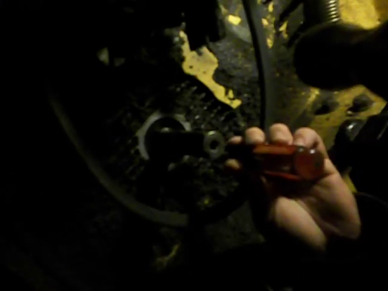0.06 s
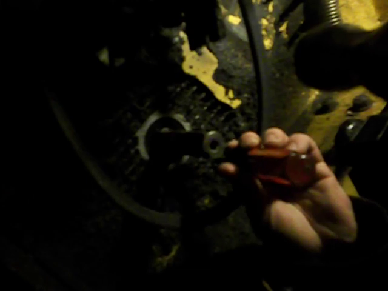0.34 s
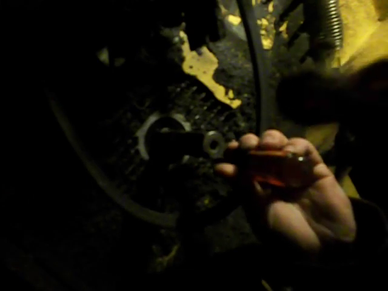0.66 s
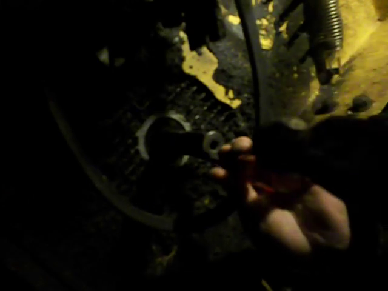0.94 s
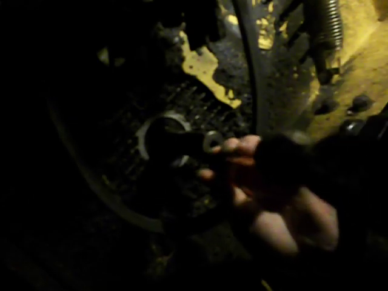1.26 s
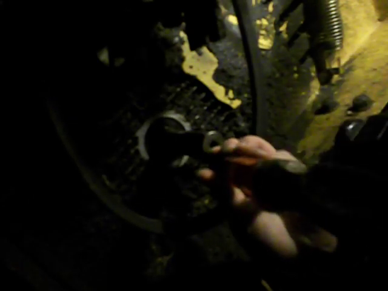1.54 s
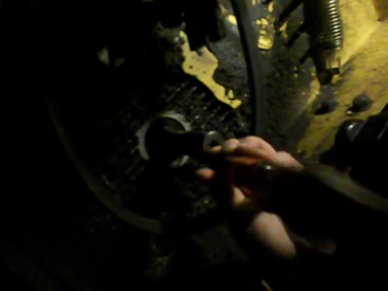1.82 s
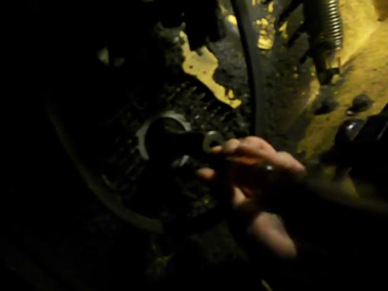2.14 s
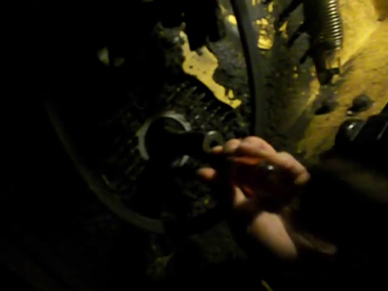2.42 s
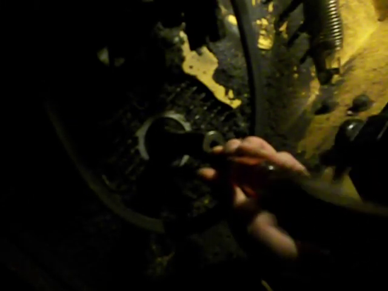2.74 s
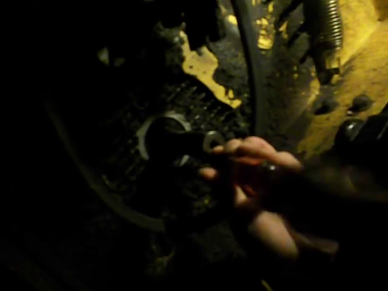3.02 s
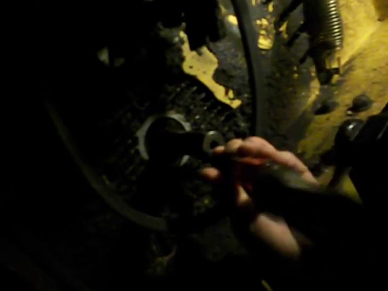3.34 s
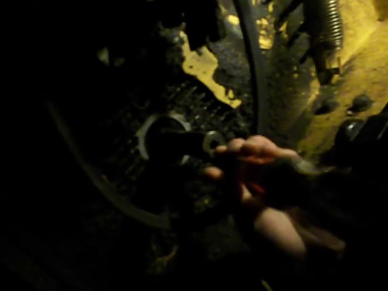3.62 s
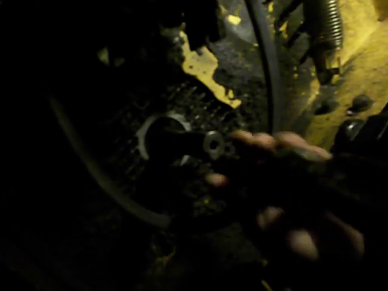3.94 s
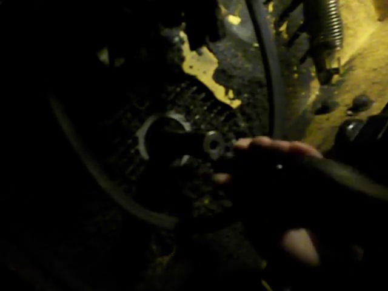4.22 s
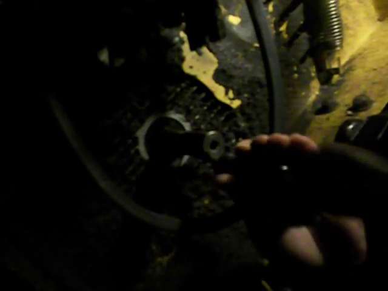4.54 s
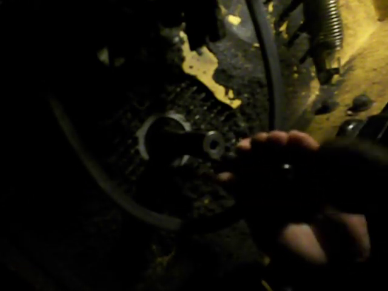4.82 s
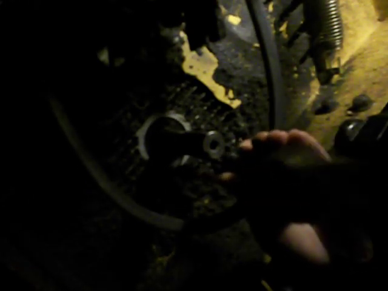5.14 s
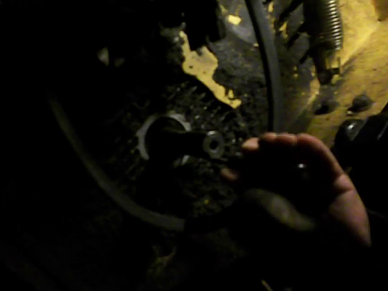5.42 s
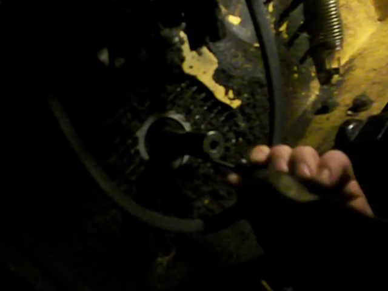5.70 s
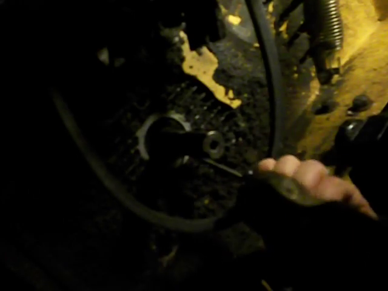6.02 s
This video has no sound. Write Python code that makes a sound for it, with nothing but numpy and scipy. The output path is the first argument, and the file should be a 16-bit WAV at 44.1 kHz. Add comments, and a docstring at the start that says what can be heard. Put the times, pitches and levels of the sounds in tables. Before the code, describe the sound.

A low hum with rumble and light hiss fills a workshop throughout. For the first two seconds there are only faint rubs of a hand on a screwdriver handle, small scrapes of its tip on an engine seal, and one soft knock at about 1.6 seconds. From 2 to 3.7 seconds a hammer taps the screwdriver eight times, between three and four blows a second. Each gives a sharp, short steel clink and a low thud in the engine casing, with a little room echo. Sometimes the hammer bounces lightly or the tip scrapes between blows. After a pause with faint scraping around 4 seconds, four more strong blows fall from 4.5 to 5.3 seconds, ringing slightly longer. The loud hits overload the close microphone and briefly push the background down. A faint rub follows at 5.5 seconds, and the hum carries on to about 6 seconds.

```python
"""A low hum fills a workshop; a hand rubs a screwdriver's handle and its tip scrapes an engine's shaft seal.
Then a hammer taps the screwdriver in two runs of blows. Each blow clinks in the steel and thuds in the
engine casing; sometimes the hammer bounces, or the tip scrapes as it is set back in place.
Loud blows overload the close microphone, and its gain control briefly turns the background down."""
import sys
import numpy as np
from scipy import signal
from scipy.fft import rfft, irfft
from scipy.io import wavfile
from scipy.ndimage import minimum_filter1d

SR = 44100
rng = np.random.default_rng(int(sys.argv[2]) if len(sys.argv) > 2 else 0)


def master(y):
    """Save y as 16-bit WAV."""
    cut = np.clip(np.atleast_2d(y).T, -1, 1)
    pcm = np.round(cut * 32767)  # scale
    wavfile.write(sys.argv[1], SR, pcm.astype(np.int16))


N = 271656
TIME = np.arange(N) / SR
AGE = np.arange(int(.6 * SR)) / SR   # seconds since a contact

# Levels are relative. A "decay" is the time a sound takes to die away by 60 dB.
# tone colour of the workshop's rumble and the microphone's hiss: f/Hz, level/dB
BACKGROUND_COLOUR = [(15, -14), (30, 9), (45, 2.5), (120, -4), (150, 2), (350, -2.5), (550, -5.5),
                     (690, -11.5), (930, -9), (1250, -17.5), (2400, -17.5), (3300, -14), (5200, -11.5),
                     (7100, -18.5), (7700, -30)]
# how the hum and rumble rise and fall: t/s, level/dB
BASS_LEVELS = [(0, -1.5), (1.9, -0.5), (2.5, 2), (3.2, 3), (4.35, -2), (4.7, -1), (5.35, -3), (5.7, -1.5),
               (6.16, -2.5)]
# a faint airy tone swells and fades: t/s, level/dB
AIRY_LEVELS = [(0, -60), (2.6, -48), (3.1, -45), (3.35, -40.5), (3.7, -62), (6.16, -71)]
# a hand rubs the handle (lower) and the tip scrapes the metal (higher): t/s, level/dB, f/Hz
HANDLING_SCRAPES = [(0.068, -26, 4080), (0.15, -33, 1550), (0.451, -36, 1660), (1.588, -32.5, 3330),
                    (1.82, -35, 2400), (2.2, -39, 1700), (2.267, -23, 4630), (2.543, -32, 3980),
                    (2.714, -30, 4840), (2.862, -36, 3700), (3.954, -34, 3570), (4.014, -34, 2360),
                    (5.52, -30, 1800)]
# hammer blows: t/s, clink level/dB, thud level/dB, shank f/Hz, screwdriver ring level/dB, delay until the
# hammer rebounds/s, rebound level/dB
HAMMER_BLOWS = [(1.601, -29, -14, 3390, 7, .010, 0), (1.9834, -1, -3.5, 3910, -2, 0.0029, -0.5),
                (2.300, 2.5, 1, 3730, -2, 0.0037, 2.5), (2.600, 5, -.5, 3650, -2, 0.0047, -2),
                (2.894, 3.5, -1, 3840, 3, 0.0033, 5), (3.1757, 4, 2, 4176, -3, 0.0054, 1),
                (3.46, 10, 3, 4430, 0.5, 0.006, -1), (3.7185, -0.5, 1.5, 4490, -7, .0039, 4.5),
                (4.4889, 10, 2, 4960, -7, 0.0066, 4.5), (4.755, 8.5, 2, 4535, -4.5, 0.0075, 4.5),
                (5.0122, 6, 2, 3370, -7, 0.011, -2.5), (5.2643, 6.5, -0.5, 3349, 6.5, 0.0094, -4)]
# the hammer drops back onto the handle: t/s, clink level/dB, thud level/dB
HAMMER_BOUNCES = [(2.633, -38, -12.5), (2.927, -34, -7), (3.228, -23.5, -13), (3.497, -29, -30),
                  (3.7646, -13, -10.5), (4.791, -18, -18), (5.040, -19.5, -13)]
# shared by all bounces: shank f/Hz, ring level/dB, rebound delay/s, rebound level/dB
BOUNCE_SETTINGS = (4610, -7, 0.001, 5.5)
# the grip loosens, so the tool rings longer and the handle higher: t/s, base decay/s, handle f/Hz
LOOSENING_GRIP = [(2.0, 0.028, 1844), (3.5, 0.037, 1869), (4.5, 0.048, 1914), (5.26, 0.053, 2135)]
# tone colour of many crowded, short-lived metal rings: f/Hz, level/dB
CLATTER_COLOUR = [(100, -17), (350, -20), (640, -9), (1200, 5), (1800, 5), (2500, 8), (3100, 0.5),
                  (3700, 10.5), (5000, 6.5), (6200, 11), (7500, 4.5)]
# tones of the hammer head and screwdriver shank, before the grip damps them: f/Hz, level/dB, decay/s
STEEL_TONES = [(1627, -17, 0.054), (1870, -12, 0.02), (2158, -29, 0.067), (2880, -3, 0.015),
               (2760, -28, 0.015), (3286, -10.5, 0.011), (3387, -23.5, 0.17), (3725, -5.5, 0.035),
               (3743, 6, 0.012), (4140, -12.5, 0.043), (4463, -8, 0.057), (5086, -5, 0.036),
               (4814, -14.5, 0.12), (6050, -33, 0.0081)]
# tones of the engine casing and the hollow in front of it: f/Hz, level/dB, decay/s
CASING_TONES = [(52, -39, 0.12), (130.6, -17.5, 0.14), (169.6, -27.5, 0.46), (212, -29, 0.64),
                (251.7, -24.5, 0.25), (364.3, 2, 0.024), (383.5, -12, 0.069), (386.3, -22, 0.099),
                (473.3, -25, 0.25), (501, -30, 0.19), (767, -8.5, 0.017), (861, -16.5, 0.08),
                (980, -41, 0.68), (1033, -21.5, 0.11), (1193, -21, 0.084), (1500, -16.5, 0.061)]
# tone colour of the workshop's echo: f/Hz, level/dB
ECHO_COLOUR = [(80, 4), (170, 17), (240, 13.5), (400, 7.5), (700, -3), (1000, 1), (1500, -4.5), (3000, -17),
               (5000, -27), (7500, -27)]


def from_db(db):
    """Turn decibels into a number to multiply by."""
    return 10 ** (np.asarray(db) / 20)


def unit_power(x):
    """Scale a sound so its average power is 1."""
    return x / np.sqrt(np.mean(x ** 2) + 1e-20)


def fade(decay_s):
    """Die away after a contact, by 60 dB in decay_s."""
    return np.exp(-np.log(1000) * AGE / decay_s)


def noise(colour, size=len(AGE)):
    """Noise of power 1 with the given tone colour."""
    hz, db = np.transpose(colour)
    log_hz = np.log(np.fft.rfftfreq(size, 1 / SR) + 1)
    gains = from_db(np.interp(log_hz, np.log(hz), db))
    return unit_power(irfft(rfft(rng.standard_normal(size)) * gains, size))


def drift(rate_hz):
    """A slow random wander of about 1 either way."""
    hz = np.fft.rfftfreq(N, 1 / SR)
    return unit_power(irfft(rfft(rng.standard_normal(N)) / (1 + (hz / rate_hz) ** 4), N))


def resonate(x, hz, width_hz):
    """Bring out one band of pitch, then scale to power 1."""
    r = np.exp(-np.pi * width_hz / SR)
    feedback = [1, -2 * r * np.cos(2 * np.pi * hz / SR), r * r]
    return unit_power(signal.lfilter(np.array([1, 0, -1]) * (1 - r * r) / 2, feedback, x))


def dull(x, hz, order=2):
    """Take off the treble above hz; a higher order cuts more steeply."""
    return signal.sosfilt(signal.butter(order, hz, fs=SR, output="sos"), x)


def ring(tones, scatter_db=0):
    """The fading tones of a struck object; neighbours swing in opposite directions."""
    extra_db = scatter_db * rng.standard_normal(len(tones))
    return sum((-1) ** k * from_db(db + extra_db[k]) * np.sin(2 * np.pi * hz * AGE) * fade(decay_s)
               for k, (hz, db, decay_s) in enumerate(tones))


def add(track, s, sound):
    """Lay a sound into the track, s seconds in."""
    start = round(s * SR)
    track[start:start + len(sound)] += sound[:len(track) - start]


def workshop(motor_hz=90.0, mains_hz=117.5, rumble_below_hz=290):
    """A motor's hum and a faint mains tone over rumble, the room's low boom, an airy tone and hiss."""
    motor = from_db(-35) * np.sin(2 * np.pi * motor_hz * TIME)
    mains = from_db(-42.5 + 2 * drift(rate_hz=1.2)) * np.sin(2 * np.pi * mains_hz * TIME)
    boom = from_db(-43.5) * resonate(rng.standard_normal(N), hz=93, width_hz=12)
    airy_gain = from_db(np.interp(TIME, *np.transpose(AIRY_LEVELS)))
    airy = airy_gain * resonate(rng.standard_normal(N), hz=975, width_hz=70)
    background = from_db(-32.5) * noise(BACKGROUND_COLOUR, N)
    rumble = signal.sosfiltfilt(signal.butter(2, rumble_below_hz, fs=SR, output="sos"), background)
    hiss = background - rumble
    bass_gain = from_db(np.interp(TIME, *np.transpose(BASS_LEVELS)))
    return bass_gain * (np.sqrt(2) * (motor + mains) + boom + rumble) + airy + hiss


def handling_scrapes(slips_per_s=6000, scatter_db=5, length_s=.024):
    """A hand rubs the handle (lower) and the tip scrapes the metal (higher), in runs of tiny slips."""
    out = np.zeros(N)
    swell = (1 - fade(.02)) * np.exp(-(AGE / length_s) ** 2)
    for s, db, hz in HANDLING_SCRAPES:
        slips = rng.standard_normal(len(AGE)) * (rng.random(len(AGE)) < slips_per_s / SR)
        slips *= from_db(scatter_db * rng.standard_normal(len(AGE)))
        add(out, s, from_db(db) * resonate(slips, hz, width_hz=0.46 * hz) * swell)
    return out


def screwdriver_ring(hz, db, decay_s, split):
    """A tool that is not quite round, and is pressed sideways, bends at three close pitches."""
    return ring([(hz * (1 - split), db, decay_s), (hz, db, decay_s),
                 (hz * (1 + split), db - 10, decay_s)])


def steel_clink(s, usual_clatter, shank_hz, ring_db, rebound_s, rebound_db, fresh_share=0.6):
    """Hammer and screwdriver ring when struck; a tighter grip stops them sooner."""
    grip_times, grip_decays, handle_pitches = np.transpose(LOOSENING_GRIP)
    decay_s = np.interp(s, grip_times, grip_decays)
    handle_hz = np.interp(s, grip_times, handle_pitches)
    # the same parts are struck each time, never in quite the same way
    clatter = np.sqrt(1 - fresh_share) * usual_clatter + np.sqrt(fresh_share) * noise(CLATTER_COLOUR)
    shank = screwdriver_ring(shank_hz, ring_db, 0.54 * decay_s, split=0.0558)
    handle = screwdriver_ring(handle_hz, ring_db - 0.5, 0.49 * decay_s, split=0.072)
    steel = from_db(1.5) * ring(STEEL_TONES, scatter_db=3) * fade(4 * decay_s)
    clink = clatter * fade(decay_s) + shank + handle + steel
    # the hammer springs back and lands again with a bright snap that renews the shank's ring
    snap = resonate(noise(CLATTER_COLOUR), hz=5200, width_hz=5200) * fade(.024)
    add(clink, rebound_s, from_db(rebound_db) * (snap + shank / 2))
    return clink


def casing_thud():
    """The engine casing rings low, and the room's echo builds up just behind it."""
    casing = from_db(-0.5) * ring(CASING_TONES, scatter_db=3)
    build_up = 1 - fade(0.019)
    echo = from_db(-18.5) * noise(ECHO_COLOUR) * fade(0.36) * build_up
    return casing + echo


def hammer():
    """Each blow or bounce passes through the screwdriver into the engine: a clink and a thud."""
    out = np.zeros(N)
    usual_clatter = noise(CLATTER_COLOUR)
    bounces = [(*row, *BOUNCE_SETTINGS) for row in HAMMER_BOUNCES]
    for s, clink_db, thud_db, *clink_settings in HAMMER_BLOWS + bounces:
        clink = steel_clink(s, usual_clatter, *clink_settings)
        add(out, s, from_db(clink_db) * clink + from_db(thud_db) * casing_thud())
    return out


def engine_bay(x, reflection_s=.0102):
    """The casing throws each blow back, dulled, and the metal parts around it scatter the sound."""
    out = x.copy()
    add(out, reflection_s, from_db(-16.5) * dull(x, hz=1380))
    scatter = noise(CLATTER_COLOUR) * fade(0.16) * (1 - fade(0.12))
    scatter /= np.linalg.norm(scatter)
    return out + from_db(-29) * signal.fftconvolve(x, scatter)[:N]


def smooth(x, lag_s):
    """A running average that follows x with a lag."""
    r = np.exp(-1 / (lag_s * SR))
    return signal.lfilter([1 - r], [1, -r], x)


def gain_control(x, threshold_db=-16, cut_per_db=0.51, hold_s=0.025, recover_db_per_s=37):
    """Loud bursts pull the volume down; it waits a moment, then creeps back."""
    level_db = 10 * np.log10(smooth(x ** 2, lag_s=0.042) + 1e-12)
    cut_db = cut_per_db * np.maximum(level_db - threshold_db, 0)
    half_hold = int(hold_s * SR / 2)
    held_db = -minimum_filter1d(-cut_db, 2 * half_hold + 1, origin=half_hold)   # deepest recent cut
    recovery_db = recover_db_per_s * TIME
    easing_db = np.maximum.accumulate(held_db + recovery_db) - recovery_db
    return x * from_db(-smooth(easing_db, lag_s=0.033))


def scene():
    """All the sounds meet at one microphone, copied to two channels."""
    return np.tile(engine_bay(hammer()) + handling_scrapes() + workshop(), (2, 1))


def record(dry, overload_at=0.95, left_lag_s=6.35e-5):
    """A mono recorder ducks and clips loud peaks and cuts the treble; its left channel is a hair late."""
    overloaded = np.clip(gain_control(dry[0]), -overload_at, overload_at)
    right = np.clip(dull(overloaded, hz=7900, order=18), -1, 1)
    delay = np.exp(-2j * np.pi * np.fft.rfftfreq(N, 1 / SR) * left_lag_s)
    left = irfft(rfft(right) * delay, N)
    return dull(np.array([left, right]), hz=16500, order=12)


dry = scene()
out = record(dry)
master(out)
```